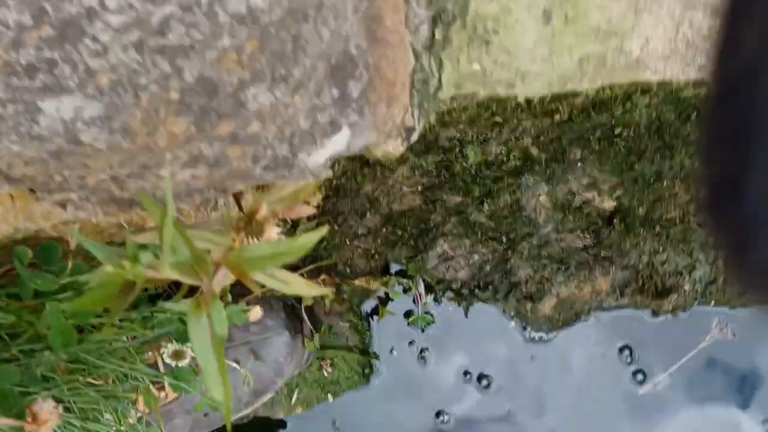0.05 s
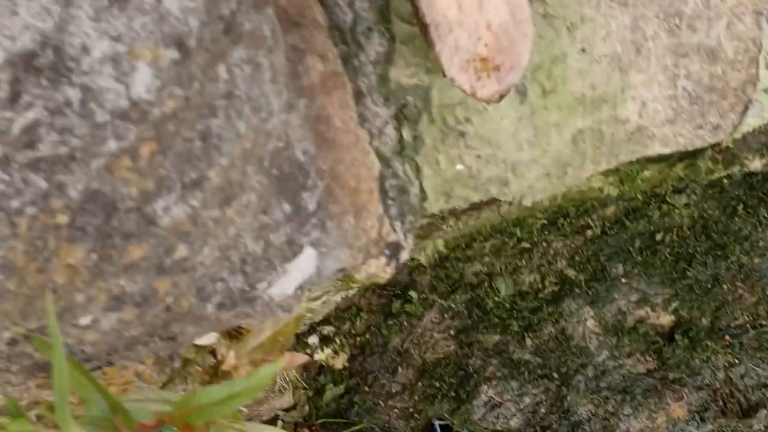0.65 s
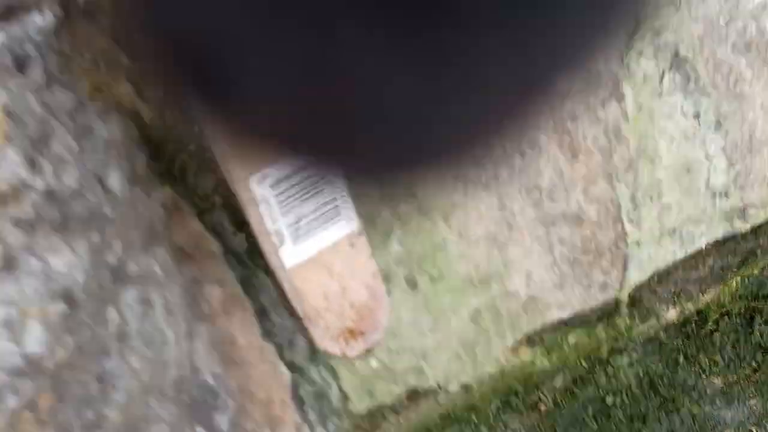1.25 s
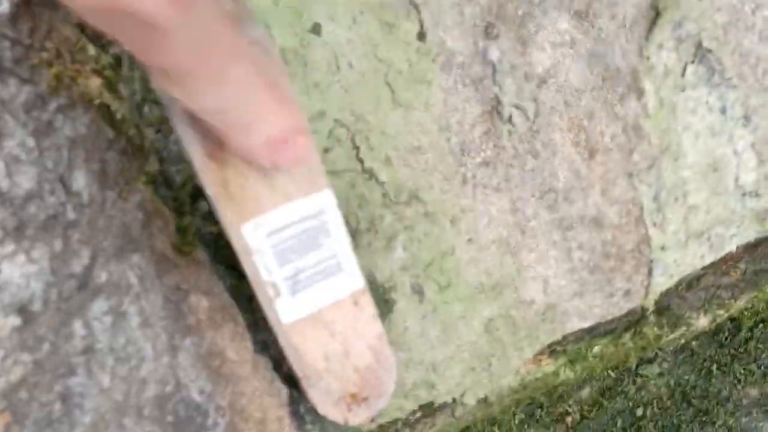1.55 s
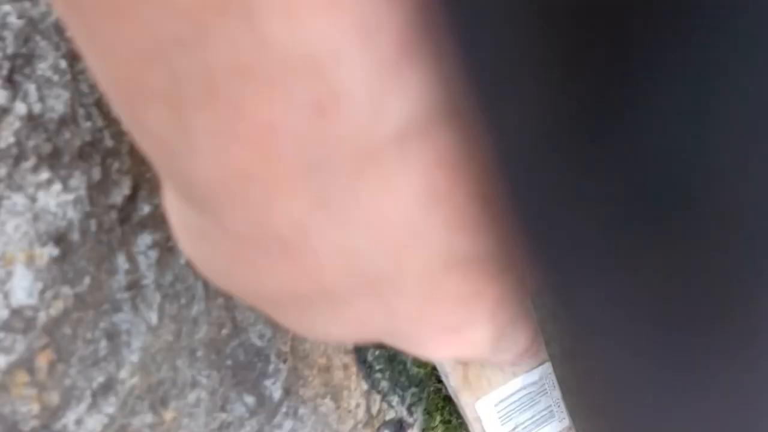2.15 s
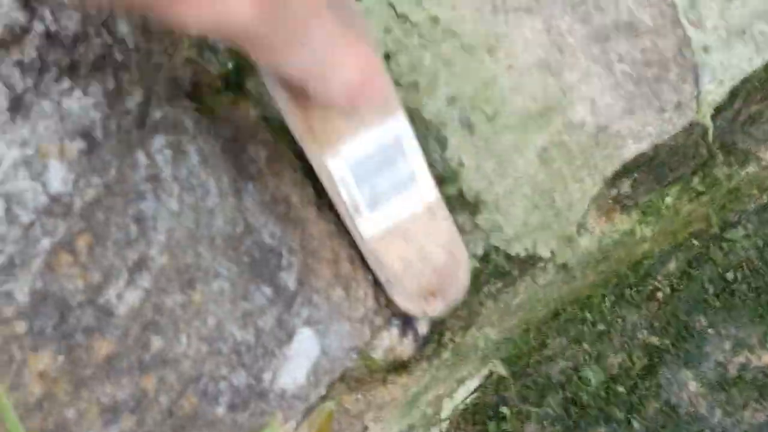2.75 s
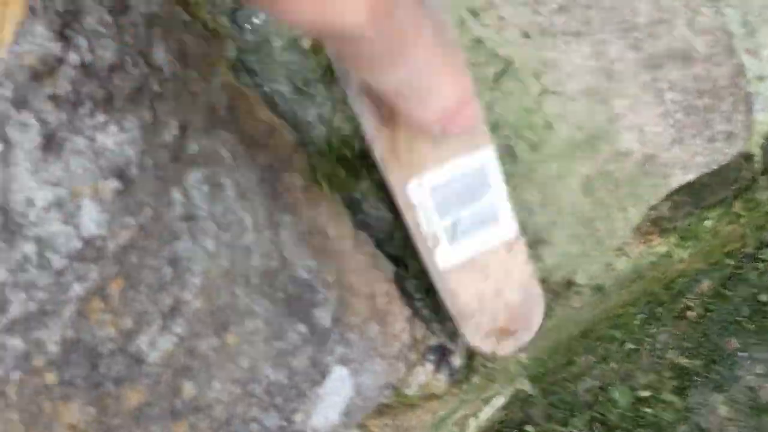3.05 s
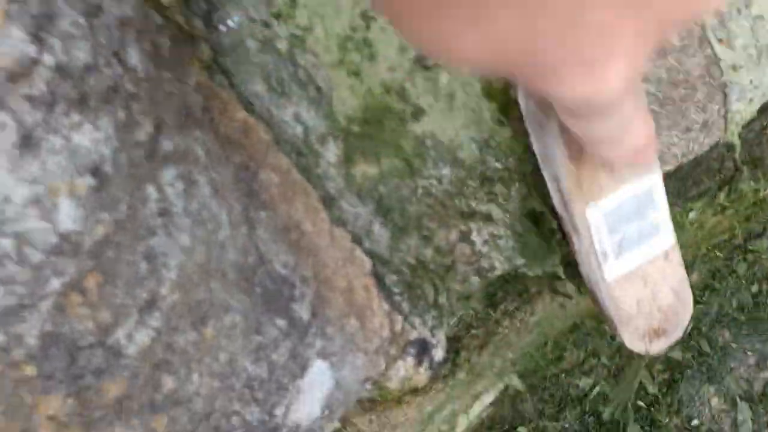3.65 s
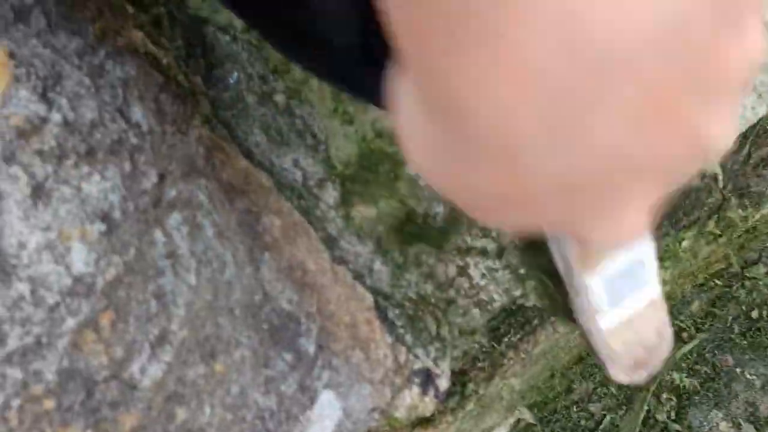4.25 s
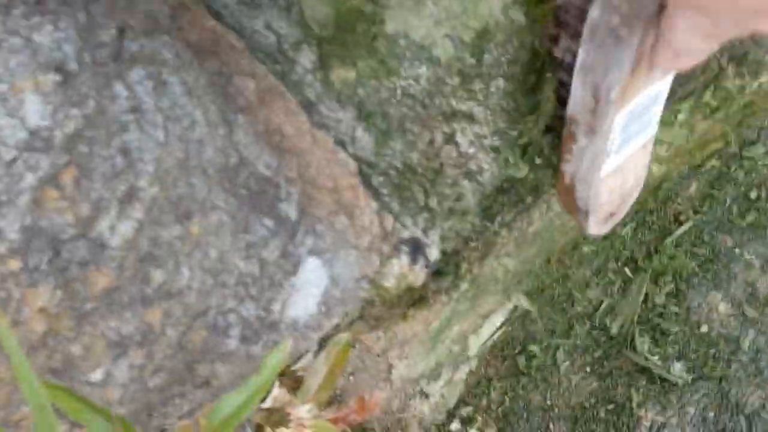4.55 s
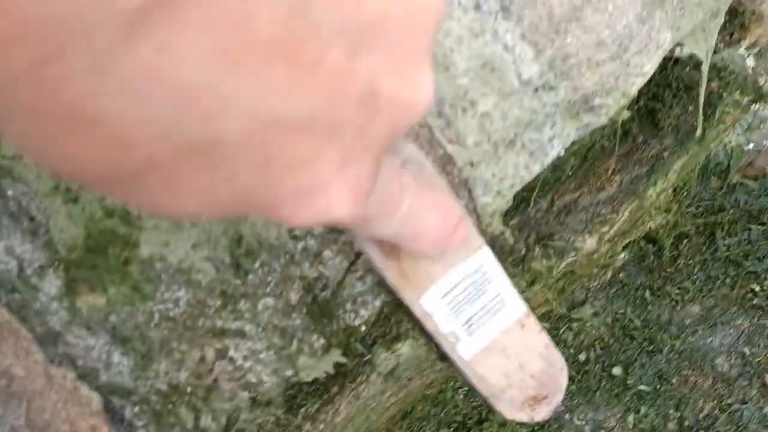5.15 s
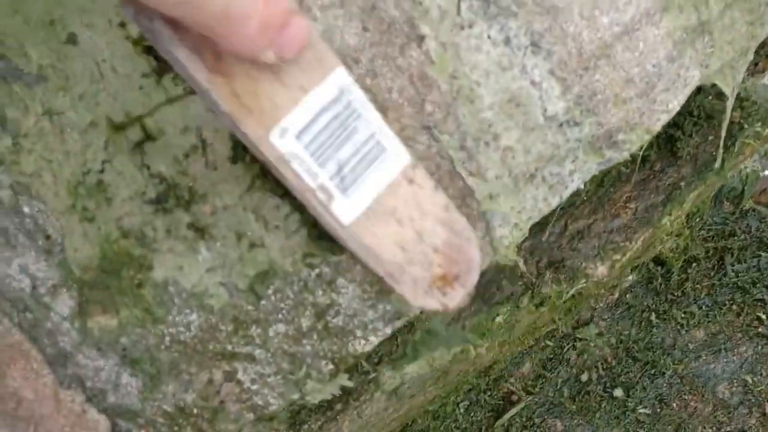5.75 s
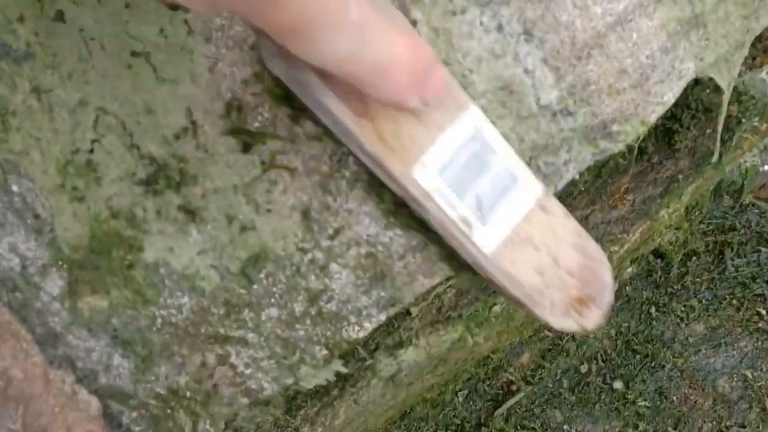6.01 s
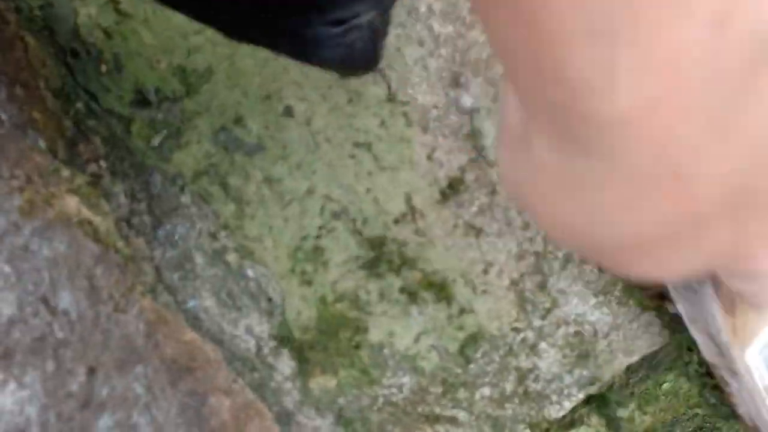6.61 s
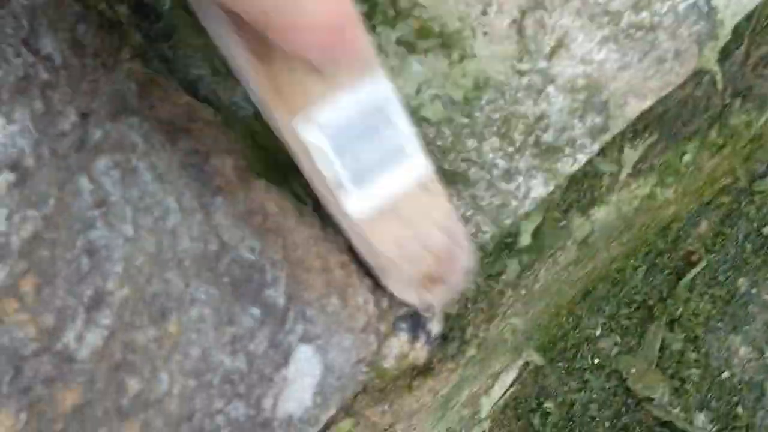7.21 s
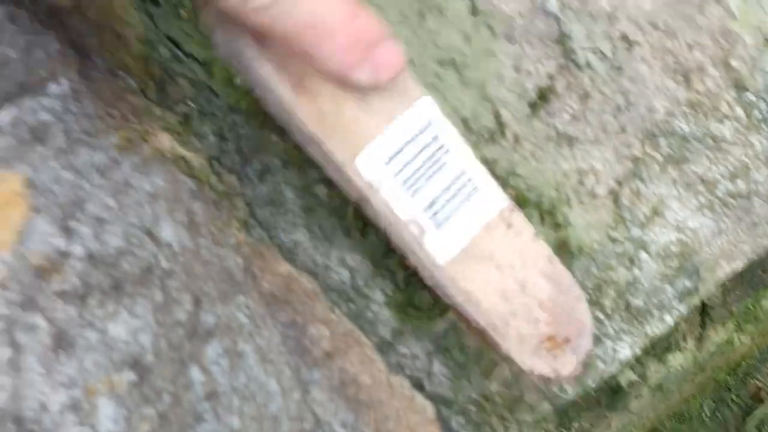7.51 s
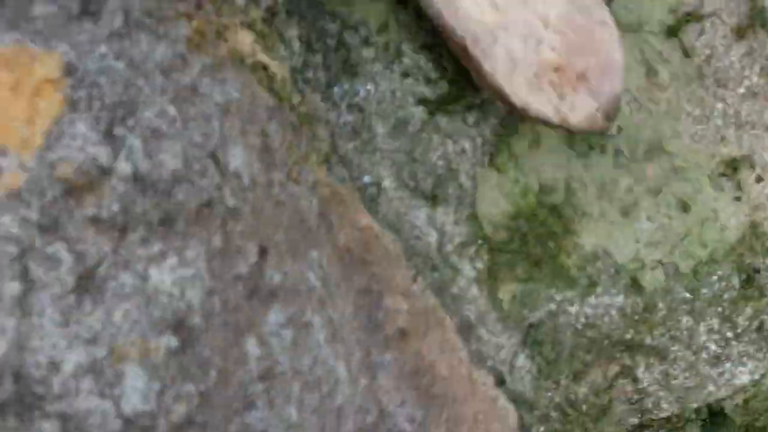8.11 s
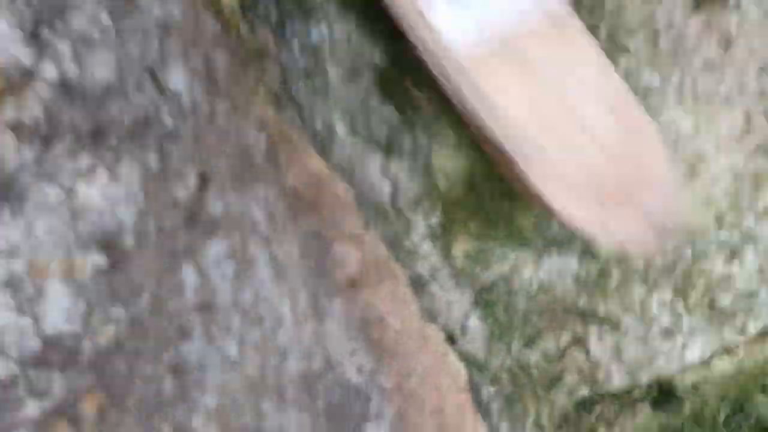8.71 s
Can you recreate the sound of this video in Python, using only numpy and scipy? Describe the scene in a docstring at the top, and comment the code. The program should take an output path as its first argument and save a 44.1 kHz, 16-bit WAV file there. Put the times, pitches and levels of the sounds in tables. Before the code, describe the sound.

A wire brush makes a few light, crackly dabs at dried weed on stone, then lands with a knock and scrubs hard back and forth, about five strokes a second. The wires scrape and fizz brightly while the wooden handle rumbles and occasionally knocks. The brush is close to the stereo microphones, a little to the right, with soft outdoor air and a faint pond pump hum behind.

```python
"""Beside a garden pond, a wire brush scrubs dried weed off stone, close to a stereo pair of microphones.
A few light, crackly dabs, then the brush is set down hard and driven to and fro, five or six strokes
a second. Wire tips catch on grit and flick free, bent tufts rasp and judder, and the wooden handle
rumbles and knocks on the stone. Farther off, the pond pump hums faintly in the open air."""
import sys
import numpy as np
from scipy import signal
from scipy.fft import rfft, irfft, next_fast_len
from scipy.io import wavfile
from scipy.ndimage import uniform_filter1d

SR = 44100
rng = np.random.default_rng(int(sys.argv[2]) if len(sys.argv) > 2 else 0)


def master(y):
    """Save y as 16-bit WAV."""
    cut = np.clip(np.atleast_2d(y).T, -1, 1)
    pcm = np.round(cut * 32767)  # scale
    wavfile.write(sys.argv[1], SR, pcm.astype(np.int16))


N = 395577
T = np.arange(N) / SR


def amp(db):
    """Decibels to gain."""
    return 10 ** (np.asarray(db) / 20)


def unit_rms(x):
    """Scales to rms 1."""
    return x / np.sqrt(np.mean(x ** 2) + 1e-20)


def over_hz(rows, hz):
    """Reads a spectrum table on a log-frequency axis."""
    row_hz, value = np.transpose(rows)
    return np.interp(np.log(hz + 1), np.log(row_hz + 1), value)


def over_time(rows):
    """Reads a time table at every sample."""
    return np.interp(T, *np.transpose(rows))


def add(mix, start_s, sound):
    """Mixes a stereo sound in at start_s."""
    part = mix[:, max(round(start_s * SR), 0):][:, :sound.shape[1]]
    part += sound[:, :part.shape[1]]


def wander(per_s):
    """Random drift through per_s new values a second."""
    return np.interp(T * per_s, np.arange(4096), rng.standard_normal(4096))


def pan(left_db):
    """Constant-power gains, left_db louder at the left microphone than at the right."""
    gains = amp(np.array([left_db, -left_db]).reshape(2, -1) / 2)
    return gains / np.sqrt(np.mean(gains ** 2, 0))


def resonate(x, hz, width_hz):
    """A resonance that follows hz, steady or moving."""
    turn = np.exp(2j * np.pi * np.cumsum(hz * np.ones(N)) / SR)
    pole = np.exp(-np.pi * width_hz / SR)
    return 2 * (turn * signal.lfilter([1 - pole], [1, -pole], x / turn)).real


# How alike the two microphones hear each band: frequency_hz, correlation
MIC_LIKENESS = [(50, 0.17), (130, 0.91), (300, 0.67), (700, 0.47), (1400, 0.13), (3000, 0), (16000, 0.035)]
def colour(pair, spectrum):
    """Shapes two signals to a spectrum at rms 1; the low mids reach both microphones much alike."""
    size = next_fast_len(pair.shape[1])
    hz = np.fft.rfftfreq(size, 1 / SR)
    left, other = rfft(pair, size)
    likeness = over_hz(MIC_LIKENESS, hz)
    right = likeness * left + np.sqrt(1 - likeness ** 2) * other
    shaped = np.array([left, right]) * amp(over_hz(spectrum, hz))
    return unit_rms(irfft(shaped, size)[:, :pair.shape[1]])


# Open air all round the microphones: frequency_hz, relative_db
AIR_SPECTRUM = [(20, -66), (60, -4.5), (130, -1.5), (330, -3.5), (430, -8.5), (600, -15), (2600, -21),
                (8000, -32.5), (16000, -29.5)]
# Tones of the pond pump: pitch_hz, level_db
PUMP_TONES = [(113, -58), (226, -55), (355.3, -56)]
def garden(air_db=-47.5, waver_db=4.0):
    """Well behind the brush, a soft outdoor wash wavers and the pond pump hums."""
    air = colour(rng.standard_normal((2, N)), AIR_SPECTRUM) * amp(air_db + waver_db * wander(25))
    hum = sum(amp(db) * np.sqrt(2) * np.sin(2 * np.pi * hz * T + 1.23 * wander(6.5))
              for hz, db in PUMP_TONES)
    return (air + hum) * pan(0.8)


# Short chirps from a tuft, left of centre: start_s, pitch_hz, level_db, length_s
JUDDER_CHIRPS = [(1.8, 1033, -37, 0.045), (3.452, 1356, -38.5, 0.032), (8.025, 288.5, -21.5, 0.067),
                 (8.038, 753, -29, 0.057), (8.822, 926, -29.5, 0.03), (8.906, 884, -35.5, 0.05)]
def judders(roughness=0.79, glide=0.025):
    """A tuft sticks and slips for a few dozen cycles, its pitch creeping up."""
    out = np.zeros((2, N))
    for start_s, hz, db, length_s in JUDDER_CHIRPS:
        progress = np.linspace(0, 1, int(length_s * SR))
        shake = roughness * unit_rms(uniform_filter1d(rng.standard_normal(4096), 90))[:len(progress)]
        cycles = np.cumsum(hz * (1 + glide * (progress - .5) + 0.058 * shake)) / SR
        envelope = amp(db) * np.sin(np.pi * progress) ** 2 * (1 + shake)
        add(out, start_s, envelope * np.sin(2 * np.pi * cycles) * pan(4))
    return out


# Where the brush works in front of the microphones: time_s, left_db
BRUSH_PATH = [(0.0, 2), (0.1, -4.5), (2.37, -9.0), (3.82, -6.0), (6.92, -6), (8.82, -1.5), (8.97, -7)]
def brush_pan():
    """The brush head shifts over the stone, mostly right of centre."""
    return pan(over_time(BRUSH_PATH))


# The brush strikes stone, levels relative: start_s, crack_db, treble_db, handle_db
STRIKES = [(0.0652, -16.5, -17, -21.5), (.163, -32, 0, -48), (.842, -32, -21, -41), (0.958, -27, 7, -41),
           (1.2398, -20, -19, -26), (1.2683, -17, 1, -39), (1.447, -18.5, -16, -24), (1.788, -29, -7, -30),
           (2.149, -6.5, -15, -12.5), (2.7925, -15.5, -1, -24.5), (2.997, -11, -7, -40),
           (5.2696, -11.5, -15.5, -26.5), (6.4135, -10, -8, -20), (6.769, -7, -12, -24),
           (7.3212, -9, -23, -24.5), (7.977, -4.5, -15.5, -15)]
# The crack of a strike, close up: frequency_hz, relative_db
STRIKE_SPECTRUM = [(300, -25), (800, -3), (1120, 0.5), (1400, -7.5), (1750, 3.5), (2450, 10.5),
                   (3100, -0.5), (3900, -0.5), (4700, -1.5), (5600, -1.5), (8200, -11.5), (12000, 6),
                   (16000, 3)]
def knocks(rise_s=0.0013, ring=0.074, ring_s=0.041, gain_db=-6.0):
    """A bunch of wires or the wooden edge lands within a few milliseconds."""
    out, t = np.zeros((2, N)), np.arange(2048) / SR
    envelope = t / rise_s * np.exp(-t / rise_s) + ring * np.exp(-t / ring_s)
    for start_s, crack_db, treble_db, _ in STRIKES:
        spectrum = [(hz, db + (treble_db + 8.5) * (hz > 8000)) for hz, db in STRIKE_SPECTRUM]
        crack = colour(rng.standard_normal((2, len(t))), spectrum) * envelope
        attack = crack[:, :SR // 250].std(axis=1, keepdims=True)  # the first 4 ms carry the blow
        add(out, start_s, amp(crack_db + gain_db) * crack / attack)
    return out * brush_pan()


# Tufts ride over a bump and jolt the handle without a crack: start_s, relative_db
BUMPS = [(2.941, -22.5), (3.604, -25), (4.325, -26.5), (5.169, -24), (5.824, -25.5), (8.831, -23)]
# Modes of the wooden handle: pitch_hz, relative_db, t60_s
HANDLE_MODES = [(124, 3.5, 0.11), (208.3, 7.5, 0.09), (239.3, 10, 0.075), (311.6, -7, 0.15)]
def handle_thumps(gain_db=-1, rise_s=0.01, lag_s=.002):
    """The handle rings briefly in the fist after each strike and each bump."""
    out, t = np.zeros((2, N)), np.arange(8000) / SR
    jolts = [(start_s + lag_s, db) for start_s, _, _, db in STRIKES] + list(BUMPS)
    for start_s, jolt_db in jolts:
        ring = sum(amp(db - 60 * t / t60_s) * np.sin(2 * np.pi * hz * rng.uniform(0.96, 1.05) * t)
                   for hz, db, t60_s in HANDLE_MODES)
        ring *= 1 - np.exp(-t / rise_s)
        add(out, start_s, amp(jolt_db + gain_db) * ring / abs(ring).max() * pan(3))
    return out


# The handle's low rumble, close up: frequency_hz, relative_db
RUMBLE_SPECTRUM = [(20, -60), (45, -42), (120, 2.5), (163, -7.5), (212, 3), (300, -4.5), (420, -23.5),
                   (1000, -59)]
def handle_rumble(scrape, far, gain_db=-26, far_db=1.0, follow=0.51):
    """The handle rumbles with the scrape, a little more as the brush bears down at the far end."""
    rumble = colour(rng.standard_normal((2, N)), RUMBLE_SPECTRUM)
    return amp(gain_db + far_db * far) * scrape ** follow * rumble * pan(1.5)


def crackle(scrape, per_s=50, gain_db=-29, follow=0.29, spread_db=4, snap_s=0.0028):
    """Dry stalks and single wires snap one by one, plainest when the brush is barely moving."""
    pops = (rng.random(N) < per_s / SR) * amp(spread_db * np.minimum(rng.exponential(1, N), 2.5))
    decays = signal.lfilter([1], [1, -np.exp(-1 / (snap_s * SR))], pops + 1e-9)
    bursts = decays * rng.standard_normal((2, N))
    snaps = colour(bursts, [(600, -8), (2300, 2.5), (5600, -0.5), (8400, -15), (13000, 3.0)])
    return amp(gain_db) * scrape ** follow * snaps


def steadied(pair):
    """The arm sets the total force: tufts only share it out, so their sum holds its level."""
    return pair / np.sqrt(abs(uniform_filter1d(pair ** 2, SR // 33, axis=1)) + 1e-9)


# Midrange rasp of the tufts: frequency_hz, relative_db
RASP_SPECTRUM = [(250, -49), (540, -17), (740, -4), (900, -1.5), (1200, -3), (1550, -2), (3000, -16.5)]
# The note of the bent tufts: time_s, pitch_hz
TUFT_PITCH = [(0, 1080), (2.4, 912), (4.2, 727), (6.2, 740), (8.9, 920)]
# Strength of that note against the rasp: time_s, relative_db
TUFT_RING = [(0, -31), (4.6, 1), (5.7, 23), (6.9, -2)]
def tuft_rasp():
    """Bent tufts rasp over the stone and ring at a slowly moving pitch."""
    rasp = colour(rng.standard_normal((2, N)), RASP_SPECTRUM)
    pitch_hz = over_time(TUFT_PITCH) * (1 + 0.014 * wander(14))
    ring = unit_rms(resonate(rasp, pitch_hz, width_hz=47))
    return steadied(rasp + amp(over_time(TUFT_RING)) * ring)


def wire_flicks(per_s, spread_db, snap_s, ring, ring_s, contact_s=.2):
    """Wires catch on grit and flick free with a snap and a thin ring; tuft after tuft takes the load."""
    out, t = np.zeros((2, N)), np.arange(2048) / SR
    envelope = np.exp(-t / snap_s) + ring * np.exp(-t / ring_s)
    for middle_s in np.arange(0, T[-1] + contact_s / 2, contact_s / 2):
        on = np.flatnonzero(abs(T - middle_s) < contact_s / 2)
        if len(on):
            size = rng.laplace(size=len(on))
            released = rng.random(len(on)) < per_s[on] / SR
            flicks = released * np.sign(size) * amp(spread_db * np.minimum(abs(size), 3.6))
            load = np.cos(np.pi * (T[on] - middle_s) / contact_s)
            # each wire faces one microphone more than the other
            aim = 1 + np.sin(2 * np.pi * rng.random(len(on))) * np.array([[1], [-1]])
            tuft_voice = rng.standard_normal((2, len(t))) * envelope
            add(out, T[on[0]], signal.fftconvolve(flicks * load * aim, tuft_voice, axes=1))
    return out


# Fizz of the wire tips, close up: frequency_hz, relative_db
FIZZ_SPECTRUM = [(5000, -30), (8300, -11.5), (11000, -3.2), (13400, 1.5), (15700, -.3)]
def tip_fizz(per_s):
    """The very short snaps of the tips merge into a high fizz."""
    flicks = wire_flicks(per_s, spread_db=5.5, snap_s=0.0001, ring=0.12, ring_s=0.011)
    return colour(flicks, FIZZ_SPECTRUM)


# Wire scraping on stone, close up: frequency_hz, relative_db
SCRAPE_SPECTRUM = [(500, -41), (700, -17), (1250, -13), (1950, -6), (2260, -3), (3200, -6.5), (3850, -3.5),
                   (4650, -8), (5600, -4), (8400, -19), (11000, -88)]
# Bending modes of the wires: pitch_hz, width_hz, relative_db, far_end_gain_db
WIRE_MODES = [(2350, 160, -17.5, 6), (3920, 150, -33, 1), (5770, 370, -15, -12)]
def shaft_scrape(per_s, scrape, far, swell_db=3):
    """The wire shafts scrape; firm pressure brings out their bending modes, darker at the far end."""
    flicks = wire_flicks(per_s, spread_db=3.5, snap_s=0.00026, ring=0.29, ring_s=0.012)
    shafts = colour(flicks, SCRAPE_SPECTRUM)
    modes = np.zeros((2, N))
    for hz, width_hz, db, far_db in WIRE_MODES:
        mode = resonate(shafts, hz * (1 + 0.04 * wander(9)), width_hz)
        swell = amp(swell_db * wander(7.2))
        modes += unit_rms(mode * swell) * amp(db + far_db * far)
    return shafts + np.sqrt(scrape / scrape.max()) * modes


def off_stone(pair, bounce=.2, delay_s=.0009, travel=.3):
    """The stone mirrors the sound; the path to the microphones shifts with the hand, sweeping the tone."""
    delayed_s = T - delay_s * np.exp(travel * wander(8.2))
    reflection = np.array([np.interp(delayed_s, T, side) for side in pair])
    return steadied(pair + bounce * reflection)


# Light opening dabs: start_s, length_s, force_db
LIGHT_DABS = [(-0.095, 0.22, -34), (0.323, 0.21, -44.5), (0.825, 0.25, -37), (1.033, 0.14, -49.5),
              (1.187, 0.16, -35.5), (1.289, 0.26, -39.5), (1.515, 0.11, -40.5), (1.658, 0.14, -43.5),
              (1.822, 0.17, -48.5), (2.016, 0.071, -44.5)]
# Hard scrubbing, push and pull in turn: start_s, length_s, force_db
SCRUB_STROKES = [(2.129, 0.17, -32), (2.268, 0.21, -31), (2.432, 0.17, -25.5), (2.619, 0.18, -28.5),
                 (2.776, 0.21, -22), (2.966, 0.18, -23.5), (3.128, 0.2, -22.5), (3.324, 0.183, -28),
                 (3.49, 0.2, -22), (3.676, 0.182, -27.5), (3.841, 0.23, -22.5), (4.047, 0.19, -27.5),
                 (4.21, 0.22, -22.5), (4.434, 0.16, -29.3), (4.584, 0.2, -27), (4.784, 0.29, -25.6),
                 (5.037, 0.26, -24.3), (5.23, 0.24, -26), (5.45, 0.22, -22), (5.628, 0.22, -26.7),
                 (5.809, 0.21, -23), (5.994, 0.188, -26), (6.157, 0.23, -25), (6.372, 0.2, -28.5),
                 (6.563, 0.17, -23), (6.674, 0.28, -32), (6.927, 0.18, -22.5), (7.095, 0.26, -25.5),
                 (7.303, 0.198, -31), (7.554, 0.19, -29.5), (7.754, 0.19, -28.5), (7.953, 0.33, -30.5),
                 (8.2, 0.21, -26), (8.335, 0.23, -26.5), (8.506, 0.22, -24.5), (8.668, 0.16, -26),
                 (8.8, 0.14, -27.8), (8.88, 0.23, -33)]
# How each kind of stroke goes: lean (under 1 is fastest early), fizz_db, fizz_rise_db, rasp_db
DAB_SHAPE = (1.88, 2.7, -8, -6.5)
PUSH_SHAPE = (0.93, 3.05, -10, -15)
PULL_SHAPE = (0.74, 4.5, 10.3, -10.5)
def arm_strokes(bend_s=.031, bite_s=0.0059, held=0.82, press=1.274):
    """Each stroke speeds up and stops; returns the envelopes of scrape, fizz and rasp."""
    moves = [(row, DAB_SHAPE) for row in LIGHT_DABS]
    moves += [(row, PULL_SHAPE if k % 2 else PUSH_SHAPE) for k, row in enumerate(SCRUB_STROKES)]
    power = np.full((3, N), 1e-10)
    for (start_s, length_s, force_db), (lean, fizz_db, fizz_rise_db, rasp_db) in moves:
        on = (T > start_s) & (T < start_s + length_s)
        progress = (T[on] - start_s) / length_s
        speed = abs(np.sin(np.pi * progress ** lean))
        # the wires are quieter while they bend, then break loose
        loose = np.interp(T[on] - start_s, [bend_s, bend_s + bite_s], [held, 1])
        scrape = amp(force_db) * loose * np.tanh(press * speed ** 3.27)  # friction levels off at speed
        fizz = scrape * amp(fizz_db + fizz_rise_db * (progress - .5))
        rasp = amp(force_db + rasp_db) * speed ** 1.76
        power[:, on] += np.array([scrape, fizz, rasp]) ** 2
    return np.sqrt(power)


def arm_reach():
    """The arm's travel while scrubbing: -1 near, where a push starts, to 1 far, where a pull starts."""
    turns = [(start_s, 1 if k % 2 else -1) for k, (start_s, _, _) in enumerate(SCRUB_STROKES)]
    return over_time(turns) * (T > SCRUB_STROKES[0][0])


def brushing(grit_db=1.5, weed_db=1, creep_db=-15, scrape_db=1.09, fizz_db=1.84, rasp_db=-2):
    """The strokes drive scrape, fizz, rasp, rumble and crackle; grit and weed make the level flicker."""
    scrape, fizz, rasp = arm_strokes()
    far = arm_reach()
    # pressed wires keep creeping while the stroke turns round
    creep = amp(creep_db) * uniform_filter1d(scrape, SR // 4)
    scrape, fizz = np.hypot(scrape, creep), np.hypot(fizz, creep)
    flicks_per_s = 300 + 130000 * scrape  # harder strokes bring more wires down
    surface = unit_rms(amp(grit_db * wander(260) + weed_db * wander(55)))
    shafts = shaft_scrape(flicks_per_s, scrape, far)
    tips = tip_fizz(flicks_per_s)
    bright = amp(scrape_db) * scrape * off_stone(shafts) + amp(fizz_db) * fizz * off_stone(tips)
    low = amp(rasp_db) * rasp * tuft_rasp() * pan(1) + handle_rumble(scrape, far)
    return (surface * bright + crackle(scrape)) * brush_pan() + surface * low


def scene():
    """The brush close to the microphones, the garden behind it."""
    return brushing() + knocks() + handle_thumps() + judders() + garden()


def record(dry, cutoff_hz=16030):
    """The recorder cuts off the highest treble from both microphones."""
    lowpass = signal.firwin(1023, cutoff_hz, window=("kaiser", 9), fs=SR)
    return signal.oaconvolve(dry, lowpass[None], "same")


dry = scene()
out = record(dry)
master(out)
```